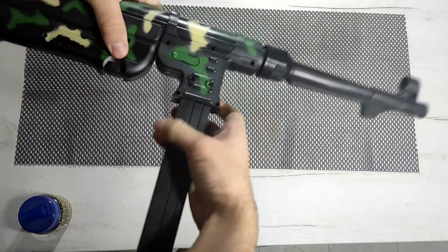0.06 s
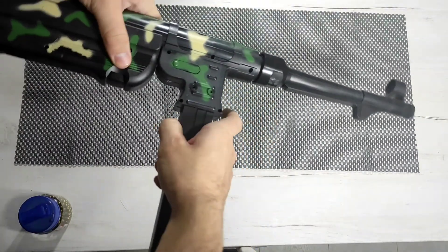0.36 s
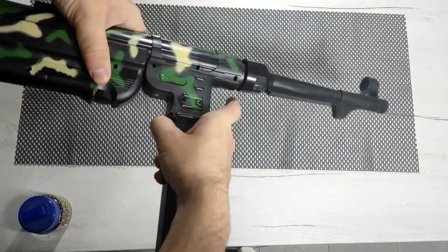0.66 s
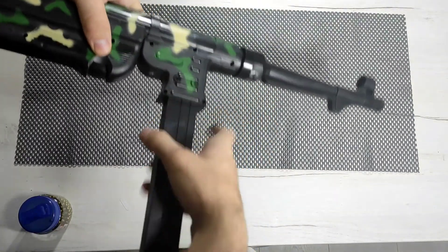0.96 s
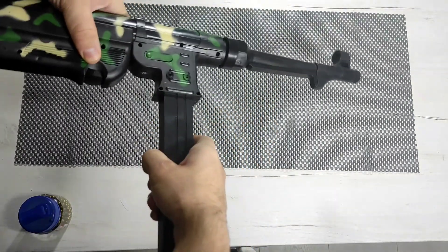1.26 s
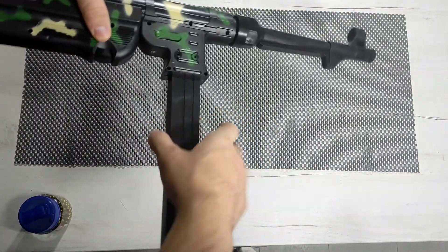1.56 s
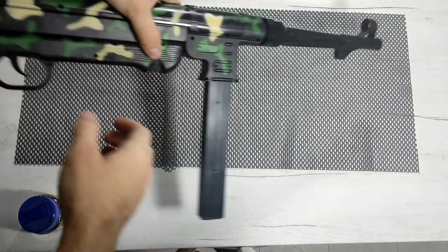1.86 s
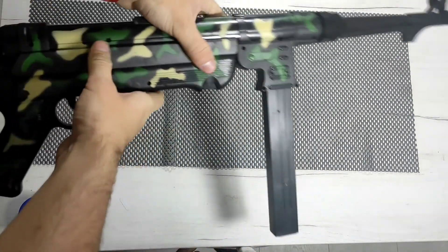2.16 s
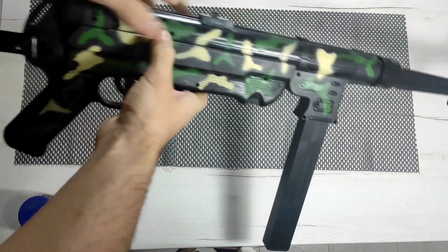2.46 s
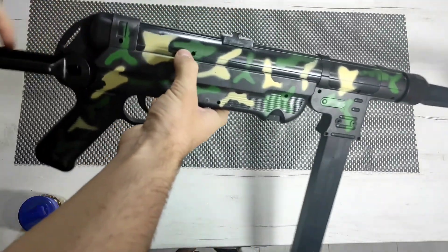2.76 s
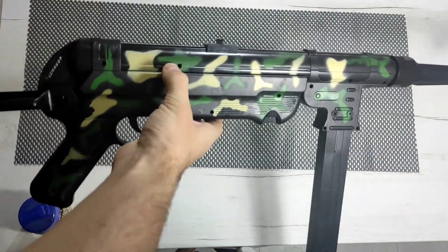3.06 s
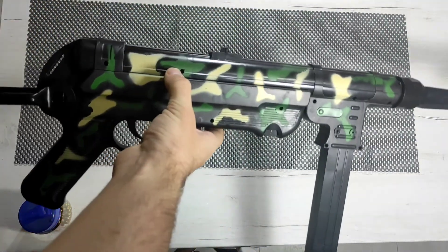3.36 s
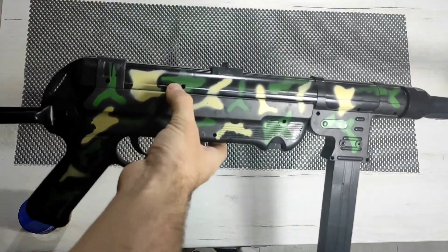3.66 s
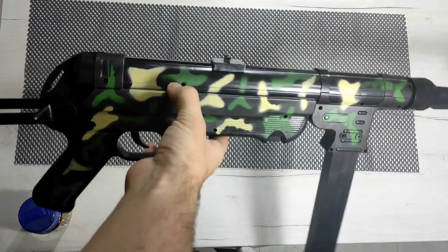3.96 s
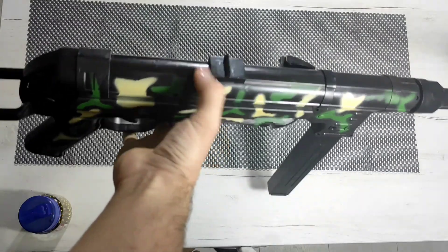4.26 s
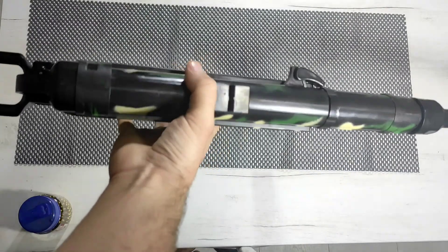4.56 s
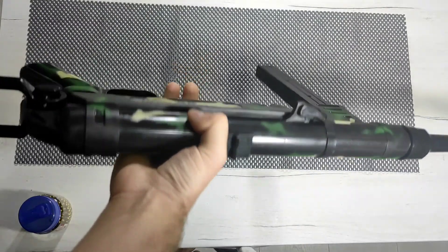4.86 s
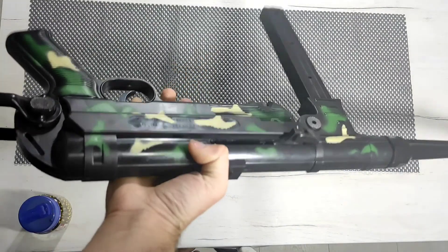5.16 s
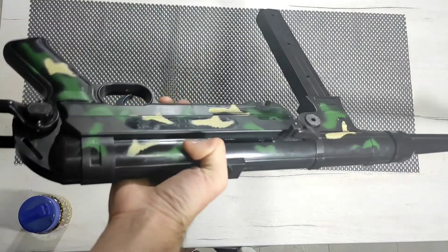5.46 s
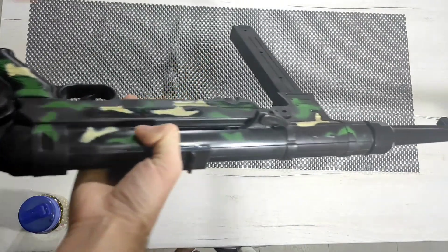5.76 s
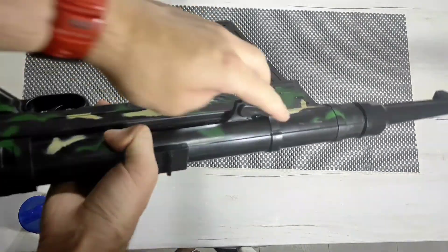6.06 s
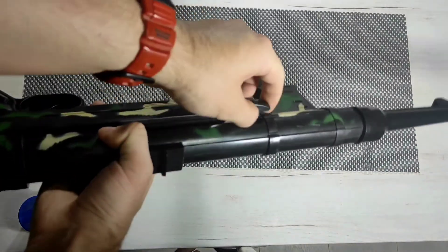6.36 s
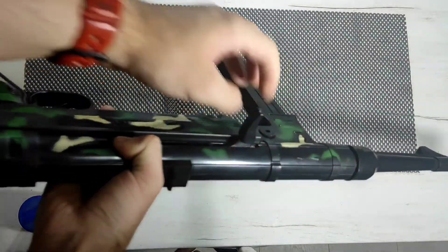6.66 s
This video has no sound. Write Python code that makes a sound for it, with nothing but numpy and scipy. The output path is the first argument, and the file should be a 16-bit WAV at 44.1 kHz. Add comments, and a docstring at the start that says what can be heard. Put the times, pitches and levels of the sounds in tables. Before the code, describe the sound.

A hand rubs on a hollow plastic toy gun as its magazine is pushed in, with sharp snaps at about 0.4 and 0.75 seconds and bright bursts of loose pellets rattling inside. Another click and short rattle come near 1.3 seconds. Around 2 seconds an arm gives a soft, deep bump. Light plastic clicks, dull knocks, rubbing and faint pellet shifts continue, with a tiny creak near 3.5 seconds. From about 4.3 to 4.7 seconds the gun rolls over and the pellets pour in a louder, slightly ringing rattle with clicks. Weaker ticks follow until about 5.4 seconds. After a lull, a small lever clicks and the body knocks softly from 6.3 to 6.8 seconds. The rattle sits a little right and the handling a little left, with the short reverberation of a small, bare room over a faint hush of air.

```python
"""Loose pellets pour and rattle inside a hollow plastic toy gun as it is tilted over a table.
Its magazine is pushed home and latches; hands rub and knock the shell, an arm bumps softly,
a joint sticks and slips in a creak, and a small lever clicks at the end.
Heard in stereo in a small, bare room, from a distance where the room is about as loud as the
direct sound, over a faint hush of air."""
import sys
import numpy as np
from scipy import signal
from scipy.fft import rfft, irfft
from scipy.io import wavfile

SR = 44100
rng = np.random.default_rng(int(sys.argv[2]) if len(sys.argv) > 2 else 0)


def materialize(psi):
    """Save the field psi as 16-bit PCM at rate SR to the path in sys.argv[1].

    A 1-D psi becomes a single channel; in a 2-D psi each row is a channel.
    """
    bounded = np.clip(np.atleast_2d(psi).T, -1, 1)
    quanta = np.round(bounded * 32767).astype(np.int16)
    wavfile.write(sys.argv[1], SR, quanta)


N = 300321
TIME = np.arange(N) / SR

# Event levels are relative within each table; the mix is set further down.
# A hand slides on the shell. Each row: start in seconds, length in seconds, level in dB.
HAND_RUBS = [(0.0, 0.0071, -46), (0.294, 0.2, -49.5), (0.493, 0.38, -52.5), (1.045, 0.024, -59),
             (1.546, 0.16, -72), (1.862, 0.058, -59.5), (2.301, 0.15, -54.5), (2.604, 0.2, -65),
             (3.06, 0.15, -59.5), (3.53, 0.16, -68.5), (4.126, 0.29, -63.5), (4.379, 0.064, -54.5),
             (4.828, 0.48, -63.5), (5.956, .33, -86), (6.345, 0.12, -67), (6.512, 0.18, -75)]
# Dull knocks on the hollow body. Each row: start in seconds, level in dB, centre in Hz.
BODY_KNOCKS = [(0.081, -45.5, 700), (0.233, -58, 1060), (0.399, -62, 1500), (0.527, -42, 380),
               (0.536, -47, 378), (0.716, -44.5, 520), (0.741, -37, 416), (0.755, -49, 485),
               (0.766, -40, 1300), (0.792, -53, 600), (1.026, -62.5, 840), (1.28, -51, 536),
               (1.576, -65.5, 720), (1.995, -65, 414), (2.185, -65.5, 745), (2.256, -58, 760),
               (2.396, -56.5, 476), (2.417, -51, 446), (2.426, -55.5, 447), (2.946, -57.5, 844),
               (3.078, -58.5, 855), (3.091, -61, 890), (3.103, -62, 800), (3.195, -61.5, 700),
               (3.212, -67, 694), (3.255, -69.5, 916), (3.559, -61, 1460), (3.573, -76, 1650),
               (3.65, -65.5, 577), (4.152, -58.5, 617), (4.342, -57, 750), (4.813, -63.5, 940),
               (4.859, -58.5, 856), (4.986, -61.5, 516), (5.122, -51.5, 834), (5.315, -53, 630),
               (5.599, -72.5, 1710), (5.701, -73, 1700), (6.384, -67, 1590), (6.573, -56.5, 1070),
               (6.643, -50, 900), (6.674, -43.5, 1020), (6.681, -48.5, 920), (6.804, -45.5, 1200)]
# Seams, catch and lever click. Each row: start in seconds, level in dB, scraping lead-in in seconds.
PLASTIC_CLICKS = [(0.0827, -42.5, 0.00063), (0.245, -54.5, 0.0012), (0.322, -43, .001),
                  (0.327, -39.5, 0.0014), (0.398, -33, .001), (0.515, -37, 0.0011), (0.539, -36, 0.00047),
                  (0.568, -36, 0.00032), (0.591, -39, .0003), (0.608, -51, .0006), (0.7602, -24, 0.0006),
                  (0.7895, -27.5, 0.0005), (0.831, -40.5, 0.00047), (1.225, -56, .0005),
                  (1.249, -37, 0.0021), (1.2956, -30.5, 0.00066), (1.301, -38, 0.00061),
                  (1.324, -51, .0005), (1.6007, -60.5, .0004), (1.6307, -72, .0004), (1.6683, -61, 0.00034),
                  (1.6912, -64.5, .0004), (1.832, -48, 0.00024), (1.931, -42, 0.00051),
                  (2.0157, -44.5, 0.00073), (2.181, -41.5, 0.00054), (2.2445, -39.5, 0.00051),
                  (2.331, -53, 0.00036), (2.379, -50, 0.00025), (2.4858, -38.5, .0002),
                  (2.541, -45, 0.00033), (2.5657, -50, 0.0009), (2.586, -40, 0.0002), (2.645, -39, 0.0004),
                  (2.753, -49, 0.0011), (2.9368, -44, 0.00047), (2.9806, -39, 0.00043), (3.002, -52, .0003),
                  (3.019, -57, 0.00037), (3.0364, -47.5, .0003), (3.1624, -51, 0.0014), (3.251, -57, .0003),
                  (3.474, -52, 0.0015), (3.515, -47.5, 0.003), (4.151, -59, 0.00073), (4.292, -58, 0.00038),
                  (4.3155, -39.5, 0.00027), (4.32, -39, 0.00023), (4.357, -45, 0.00043),
                  (4.362, -37.5, 0.00043), (4.431, -38, 0.00078), (4.497, -27, 0.00071),
                  (4.51, -36.5, 0.00063), (4.529, -31.5, 0.00072), (4.5674, -36, 0.00048),
                  (4.875, -41, 0.00033), (4.878, -49, .0004), (5.037, -55, 0.00025),
                  (5.116, -40.5, 0.00028), (5.273, -53, 0.00042), (5.289, -49, .0003),
                  (5.3035, -37.5, 0.00036), (5.321, -49, 0.00055), (5.369, -42.5, 0.00014),
                  (5.597, -66, .0006), (5.666, -68.5, 0.00038), (5.697, -68, 0.0012),
                  (5.752, -71.5, 0.00039), (5.9696, -72.5, .001), (6.326, -68, 0.00036),
                  (6.36, -64, 0.0011), (6.382, -57.5, 0.00077), (6.453, -66.5, 0.00093),
                  (6.481, -62, 0.00058), (6.569, -55.5, 0.0037), (6.641, -53.5, 0.0014),
                  (6.674, -48.5, 0.00088), (6.804, -51.5, 0.00019)]
# The pellets slide. Each row: start in seconds, length in seconds, opening level in dB,
# change over the slide in dB.
PELLET_SLIDES = [(0.317, 0.088, -31.5, -2.5), (0.402, 0.019, -13.5, -16.5), (0.492, 0.1, -28.5, -1),
                 (0.697, 0.043, -36, 12.5), (0.758, 0.06, -27, -0.5), (0.834, 0.092, -34, -3),
                 (1.16, 0.077, -75.5, 20), (1.238, 0.083, -34.5, 4), (1.275, 0.036, -36, -4),
                 (1.752, 0.18, -60, 17.5), (1.976, 0.032, -47.5, 2), (2.188, 0.26, -47, -17),
                 (2.501, 0.19, -47, 11.5), (2.691, 0.079, -47, 3.5), (2.932, 0.1, -52, 5),
                 (3.109, 0.097, -61, 3), (3.527, 0.051, -48, -2), (3.643, 0.014, -49, 2),
                 (4.358, 0.18, -33, 1.5), (4.493, 0.15, -22.5, -8), (4.816, 0.053, -53.5, -3),
                 (5.025, 0.11, -54.5, 5.5), (5.286, 0.11, -49, -4), (6.292, 0.089, -71.5, 3.5)]
# The magazine snaps into its catch. Each row: start in seconds, level in dB, bounce gap in seconds.
LATCH_SNAPS = [(0.402, -21, 0.0073), (0.753, -20.5, 0.0043)]
# Soft, deep bumps as the gun is lifted. Each row: start in seconds, level in dB.
ARM_BUMPS = [(1.975, -53), (2.017, -51)]
# A stressed joint creaks. Each row: start in seconds, level in dB, pitch in Hz, length in seconds.
JOINT_CREAKS = [(3.435, -58, 648, 0.026), (3.474, -55.5, 631, 0.033), (3.475, -53, 891, 0.03),
                (3.496, -59, 1943, 0.023)]

# The tone of rubbing skin, hollow body, thin plastic wall and still room.
# Each row: frequency in Hz, relative level in dB.
SKIN_SPECTRUM = [(80, -23), (200, -11.5), (330, 0), (600, -5.5), (1000, -4), (1700, -6.5), (3500, -16),
                 (7500, -6.5), (10000, -21), (15000, -36.5)]
BODY_SPECTRUM = [(60, -24), (150, -5.5), (230, 1), (330, 4.5), (460, 2), (560, -2), (800, -0.5), (1300, -2),
                 (1800, -3), (3000, -8), (8000, -24)]
WALL_SPECTRUM = [(80, -48.5), (250, -20), (700, -14.5), (1200, -12.5), (1800, -10.5), (2500, -7.5),
                 (3600, -4.5), (5500, -3.5), (7400, 3.5), (8800, -3.5), (10200, -10.5), (12000, -8),
                 (13000, -14), (15000, -18)]
AIR_SPECTRUM = [(20, 2), (32, -14), (47, 1), (62, -7.5), (80, -15.5), (110, -13), (200, -17), (400, -23),
                (900, -29), (1400, -35), (3000, -36), (7000, -38.5), (10500, -44.5), (15000, -54.5)]
# The rattle's pitched grain is deeper when loud. Each row: pour level in dB, share from 0 to 1.
GRAIN_SHARE = [(-50, .2), (-33, 1)]
# Resonances of the long casing. Each row: frequency in Hz, width in Hz, gain in dB.
CASING_MODES = [(1400, 660, 4), (1894, 180, 3), (2870, 170, -9.5), (3360, 160, -9.5), (3930, 153, -4),
                (4600, 200, -4), (5300, 150, 10.5), (5930, 150, 13), (6150, 120, 8), (6980, 190, -0.5),
                (6810, 400, 0), (8020, 178, -1), (8750, 450, -2), (9860, 170, 4.5)]
# Rattle passing through the casing as the gun rolls. Each row: time in seconds, share from 0 to 1.
CASING_SHARE = [(4.1, 0), (4.36, 0.27), (4.7, 0.19), (5, 0.15)]
# Resonances of the magazine tube and its spring. Each row: frequency in Hz, width in Hz,
# gain in dB while loose, gain in dB once latched.
TUBE_MODES = [(1760, 90, -2.5, -7), (3100, 86, -9, -12.5), (3860, 47, -6, -18), (4677, 69.5, -13.5, -4.5),
              (4900, 170, 1.5, -8.5), (5300, 34, -1, -5.5), (6400, 120, -5, -5), (7260, 43, -7, -12.5),
              (7490, 85, -7.5, 0), (7380, 320, -1, -6), (7750, 38, -8.5, -2), (8560, 37, -16.5, -14),
              (14110, 42, -3.5, -5.5), (14940, 120, -11.5, -8.5)]
# The magazine seats in its well. Each row: time in seconds, share latched from 0 to 1.
LATCHED_SHARE = [(.7, 0.21), (.75, 1)]
# The rattle's tone over time; the ring is stronger on the right. Each row: time in seconds,
# then gains in dB for the left ring, the right ring, the treble and the low mids.
RATTLE_TONE = [(0.22, -33, -4, -6, 9), (0.34, -18, 4.5, -8, 0.5), (0.8, -31, 8.5, -8.5, -1),
               (1.35, -38, -9, -17.5, -2), (2.2, -49.5, -9.5, -9.5, -10.5), (3.3, -38.5, 2.5, -7.5, -2),
               (4.5, -25.5, -0.5, -6.5, -2), (5.4, -26.5, 4, -8, 6), (6.8, -20, 2, -8, 5.5)]
# The room's decay. Each row: frequency in Hz, seconds to fall 60 dB.
ROOM_DECAY = [(150, 0.36), (400, 0.24), (1400, 0.44), (4000, 0.48), (8000, 0.4), (14000, 0.46)]


def from_db(db):
    """Decibels to gain."""
    return 10 ** (np.asarray(db) / 20)


def rms_one(x):
    """Scale to rms 1."""
    return x / np.sqrt(np.mean(x ** 2) + 1e-20)


def unit_energy(x):
    """Scale each channel to energy 1."""
    return x / np.sqrt(np.sum(x ** 2, axis=-1, keepdims=True) + 1e-20)


def in_time(rows):
    """The columns of a curve at every sample."""
    s, *columns = np.transpose(rows)
    return [np.interp(TIME, s, c) for c in columns]


def at_hz(points, hz):
    """Read a table on a log-frequency axis."""
    f, value = np.transpose(points)
    return np.interp(np.log(hz + 1), np.log(f), value)


def convolve(x, response):
    """Pass through a response, keeping the length."""
    return signal.fftconvolve(np.atleast_2d(x), np.atleast_2d(response), axes=-1)[:, :x.shape[-1]]


def colour(x, spectrum, size=4096):
    """Minimum-phase filter of unit energy with the given spectrum."""
    cepstrum = irfft(np.log(from_db(at_hz(spectrum, np.fft.rfftfreq(size, 1 / SR)))))
    cepstrum[1:size // 2] *= 2
    cepstrum[size // 2 + 1:] = 0
    return convolve(x, unit_energy(irfft(np.exp(rfft(cepstrum)))))


def resonance(x, hz, width_hz):
    """One resonance with gain 1 at its top."""
    return signal.lfilter(*signal.iirpeak(hz, hz / width_hz, fs=SR), x + 1e-18)


def stereo_noise(count, alike):
    """White noise whose left and right correlate by `alike`."""
    mid, side = rng.standard_normal((2, count))
    return (np.sqrt(1 + alike) * mid + np.sqrt(1 - alike) * side * [[1], [-1]]) / np.sqrt(2)


def dying(t60, count):
    """Envelope that falls 60 dB in t60 seconds."""
    return np.exp(-np.log(1000) * TIME[:count] / t60)


def uneven(spread_db, step_s, count):
    """A gain that wanders at random from step to step."""
    steps = np.arange(0, count / SR + step_s, step_s)
    step_db = spread_db * np.clip(rng.standard_normal(len(steps)), -2, 2)
    return from_db(np.interp(TIME[:count], steps, step_db))


def stroke(start_s, length_s, attack_s, release_t60):
    """Envelope of one movement: attack, hold, release."""
    t = np.maximum(TIME - start_s, 0)
    return np.minimum(t / attack_s, 1) * from_db(-60 * np.clip((t - length_s) / release_t60, 0, 2))


def add(out, s, sound):
    """Mix a sound in at s seconds."""
    start = int(np.clip(s * SR, 0, N - 1))
    out[:, start:start + sound.shape[1]] += sound[:, :N - start]


def contacts(per_s, spread_db):
    """Random impacts of uneven size, mean power 1."""
    chance = per_s / SR
    sizes = rms_one(from_db(spread_db * np.clip(rng.standard_normal(N), -2, 2)))
    return (rng.random(N) < chance) * sizes * rng.choice([-1, 1], N) / np.sqrt(chance)


def room_air(level_db=-66.5):
    """The still room: a steady hush, strongest in the deep bass."""
    return from_db(level_db) * rms_one(colour(stereo_noise(N, alike=0.17), AIR_SPECTRUM, size=16384))


def hand_rubs(slip_t60=0.031, hold_db=-81.5, gain_db=-5):
    """Skin catches on the shell in many tiny slips: single strokes over a faint, steady hold."""
    slip_power = convolve(contacts(per_s=350, spread_db=5) ** 2, dying(slip_t60, count=2048) ** 2)
    slips = rms_one(np.sqrt(np.abs(slip_power)) * stereo_noise(N, alike=0.09))
    strokes = sum(from_db(db) * stroke(s, length, attack_s=0.014, release_t60=0.31)
                  for s, length, db in HAND_RUBS)
    return colour(slips * (from_db(hold_db) + strokes) * from_db(gain_db), SKIN_SPECTRUM)


def body_knocks(db_per_octave=7, t60=0.026, build_s=0.0039, gain_db=28, count=8000):
    """A small, hard contact misses the deep modes of the body; a soft one misses the high ones."""
    out = np.zeros((2, N))
    hz, body_db = np.transpose(BODY_SPECTRUM)
    envelope = dying(t60, count) * (1 - np.exp(-TIME[:count] / build_s))
    for s, db, centre_hz in BODY_KNOCKS:
        octaves_away = np.abs(np.log2(hz / centre_hz))
        spectrum = np.column_stack([hz, body_db - db_per_octave * octaves_away])
        knock = colour(stereo_noise(count, alike=0.57) * envelope, spectrum)
        add(out, s, from_db(db + gain_db) * unit_energy(knock))
    return out


def wall_ring(pitches, t60, count):
    """A struck spot rings at pitches of its own; each reaches left and right in its own phase."""
    hz = rng.uniform(1200, 11000, (pitches, 1))
    phase = rng.uniform(0, 2 * np.pi, (2, pitches, 1))
    return unit_energy(np.sin(2 * np.pi * hz * TIME[:count] + phase).sum(axis=1) * dying(t60, count))


def clicks(rows, crack_t60=0.006, clatter_db=-16, ring_db=-7, gain_db=24, count=4000):
    """Plastic scrapes in, cracks, and leaves the clatter of the wall and a faint ring."""
    out = np.zeros((2, N))
    for s, db, scrape_s in rows:
        lead_in = 1 - np.exp(-(TIME[:count] / scrape_s) ** 2)
        clatter_t60 = 0.05 + 7.8 * scrape_s   # a longer scrape leaves a longer clatter
        ragged = uneven(spread_db=4.5, step_s=0.0013, count=count)   # parts touch, part, touch again
        clatter = from_db(clatter_db) * dying(clatter_t60, count) * ragged
        envelope = lead_in * (dying(crack_t60, count) + clatter)
        crack = unit_energy(stereo_noise(count, alike=0.049) * envelope)
        ring = from_db(ring_db) * lead_in * wall_ring(pitches=16, t60=0.03, count=count)
        click = colour(crack + ring, WALL_SPECTRUM, size=1024)
        add(out, s, from_db(db + gain_db) * unit_energy(click))
    return out


def pour_force():
    """How hard the pellets hit: the heap breaks loose at once, gains or loses speed, then settles."""
    power = 0
    for s, length, db, change_db in PELLET_SLIDES:
        speed = from_db(db + change_db * np.clip((TIME - s) / length, 0, 1))
        power += (speed * stroke(s, length, attack_s=0.012, release_t60=0.18)) ** 2
    return np.sqrt(power)


def pellets(per_s=480, spread_db=2.5, tick_t60=0.012, ring_db=-1, gain_db=-9, count=2800, hits=6000):
    """Each pellet gives a dry tick and the clink of the spot it hits, as hard as the pour is then."""
    out = np.zeros((2, N))
    times = (np.arange(hits) + rng.random(hits)) / per_s
    sizes = rms_one(from_db(spread_db * np.clip(rng.standard_normal(hits), -2, 1.6)))
    spots = []
    for _ in range(128):
        tick = unit_energy(stereo_noise(count, alike=0) * dying(tick_t60, count))
        spots.append(tick + from_db(ring_db) * wall_ring(pitches=4, t60=0.04, count=count))
    spot_hit = rng.integers(0, len(spots), hits)
    force = np.interp(times, TIME, pour_force())
    for k in np.flatnonzero(times < TIME[-1]):
        add(out, times[k], sizes[k] * force[k] * spots[spot_hit[k]])
    return from_db(gain_db) * np.sqrt(SR / per_s) * colour(out, WALL_SPECTRUM)


def magazine_latch(bounces=3, loss_db=8, scrape_s=0.00029):
    """The magazine snaps into its catch and bounces: a quick run of ever weaker clicks."""
    return clicks([(s + k * gap_s, db - k * loss_db, scrape_s)
                   for s, db, gap_s in LATCH_SNAPS for k in range(bounces)])


def pitched_grain(x, spacing_hz=105, depth=1.15, shift_s=0.11, top_db=5, size=4096):
    """Random, slowly shifting peaks and dips, alike in both channels and deeper when the pour is loud."""
    out, force = np.zeros((2, N)), pour_force()
    hz = np.arange(spacing_hz, SR / 2, spacing_hz)
    for s in np.arange(0, TIME[-1] + shift_s, shift_s):
        near = np.abs(TIME - s) < shift_s
        piece = x[:, near] * np.cos(np.pi / 2 * (TIME[near] - s) / shift_s) ** 2
        piece = np.pad(piece, [(0, 0), (0, size // 2)])   # time to ring out
        pour_db = 20 * np.log10(force[near].max() + 1e-9)
        share = np.interp(pour_db, *np.transpose(GRAIN_SHARE))
        ripple_db = share * np.minimum(depth * 10 * np.log10(rng.exponential(1, len(hz))), top_db)
        add(out, TIME[near][0], colour(piece, np.column_stack([hz, ripple_db]), size=size))
    return out


def magazine_tube(x, treble_hz=8500, low_mid_hz=2000):
    """The tube's ring changes as it latches; ring level, treble and low mids drift over time."""
    left_db, right_db, treble_db, low_mid_db = in_time(RATTLE_TONE)
    latched, = in_time(LATCHED_SHARE)
    rings = 0
    for hz, width_hz, loose_db, latched_db in TUBE_MODES:
        drive = (1 - latched) * from_db(loose_db) + latched * from_db(latched_db)
        rings += resonance(x * drive, hz, width_hz)
    treble = signal.sosfiltfilt(signal.butter(4, treble_hz, "high", fs=SR, output="sos"), x)
    low_mid = signal.lfilter(*signal.butter(1, low_mid_hz, fs=SR), x)
    shelves = (from_db(treble_db) - 1) * treble + (from_db(low_mid_db) - 1) * low_mid
    return x + from_db([left_db, right_db]) * rings + shelves


def arm_bumps(hz=42, t60=0.2, rustle_db=-7, count=10000):
    """The heavy, soft push of an arm sets off a few slow cycles and a dull rustle."""
    out = np.zeros((2, N))
    sway = np.sin(2 * np.pi * hz * TIME[:count])
    for s, db in ARM_BUMPS:
        rustle = colour(stereo_noise(count, alike=0.3), [(30, -6), (110, 13), (220, -27), (1000, -62)])
        add(out, s, from_db(db) * dying(t60, count) * (sway + from_db(rustle_db) * rustle))
    return out


def joint_creaks(bend=0.033, waver=0.61, rough_db=1.5, overtone_db=-15, count=4000):
    """Plastic sticks and slips unevenly, at an unsteady pitch that arches with the stress."""
    out = np.zeros((2, N))
    for s, db, hz, length in JOINT_CREAKS:
        stress = np.sin(np.pi * np.minimum(TIME[:count] / length, 1)) ** 2
        pitch_hz = hz * (1 + bend * (stress - 0.5) + waver * rng.standard_normal(count))
        cycles = np.cumsum(pitch_hz) / SR
        slips = from_db(rough_db * np.interp(cycles, np.arange(count), rng.standard_normal(count)))
        tone = np.sin(2 * np.pi * cycles) + from_db(overtone_db) * np.sin(4 * np.pi * cycles)
        add(out, s, from_db(db) * stress * slips * tone[None])
    return out


def casing(x):
    """As the gun rolls over, the rattle takes on the pitches of the casing, now one, now another."""
    share, = in_time(CASING_SHARE)
    rings = sum(from_db(db) * resonance(x * uneven(spread_db=4, step_s=0.06, count=N), hz, width_hz)
                for hz, width_hz, db in CASING_MODES)
    return (1 - share) * x + share * rings


def reverb(x, wet_db, alike, build_s=0.0024, count=32768):
    """The bare room's diffuse tail builds up, then dies at its own pace in each octave."""
    hz = np.fft.rfftfreq(count, 1 / SR)
    white = rfft(stereo_noise(count, alike))
    octave = np.round(np.log2(np.maximum(hz, 125) / 125))
    tail = 0
    for k in np.unique(octave):
        t60 = at_hz(ROOM_DECAY, np.median(hz[octave == k]))
        tail += irfft(white * (octave == k)) * dying(t60, count)
    build_up = 1 - np.exp(-(TIME[:count] / build_s) ** 2)
    return from_db(wet_db) * convolve(x, unit_energy(tail * build_up))


def room(x, wet_db, alike):
    """The direct sound at the microphone, with the room's tail behind it."""
    return x + reverb(x, wet_db, alike)


def scene():
    """Bright rattle a little to the right, dull handling a little to the left, over quiet air."""
    seams = clicks(PLASTIC_CLICKS)   # on the outside of the gun, so their direct sound stays sharp
    latch = magazine_latch()   # inside it, coloured like the pellets
    rattle = room(pellets(), wet_db=-1, alike=-0.18) + latch
    rattle += reverb(seams + latch, wet_db=1.5, alike=-0.071)
    rattle = magazine_tube(casing(pitched_grain(rattle)) + seams)
    handling = room(body_knocks() + hand_rubs(), wet_db=0, alike=0.88)
    handling += room(joint_creaks(), wet_db=1, alike=0.3)
    air = room_air()
    return rattle * from_db([[0.4], [2]]) + handling * from_db([[1.6], [0]]) + arm_bumps() + air


def record(dry, cutoff_hz=15300):
    """The top is cut steeply."""
    return signal.sosfilt(signal.ellip(10, 0.1, 80, cutoff_hz, fs=SR, output="sos"), dry)


dry = scene()
out = record(dry)
materialize(out)
```